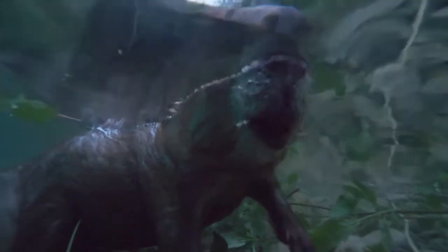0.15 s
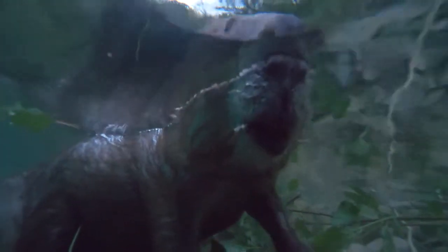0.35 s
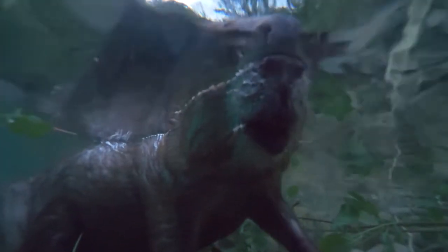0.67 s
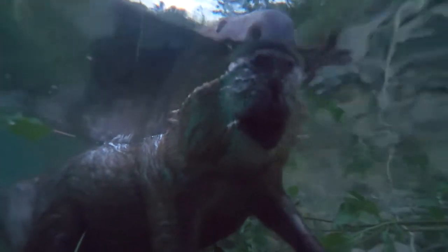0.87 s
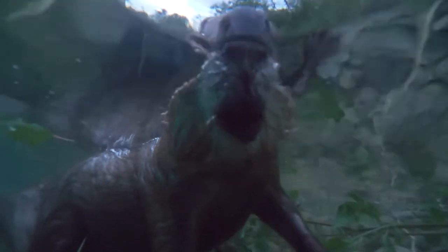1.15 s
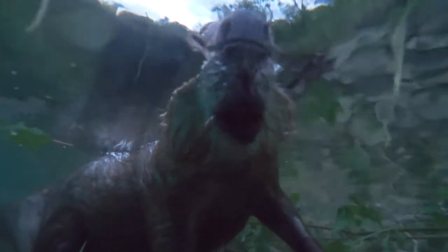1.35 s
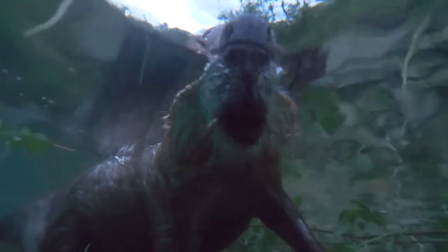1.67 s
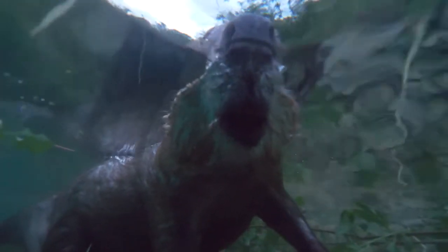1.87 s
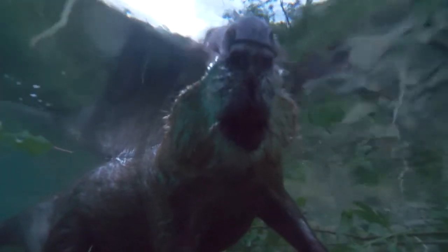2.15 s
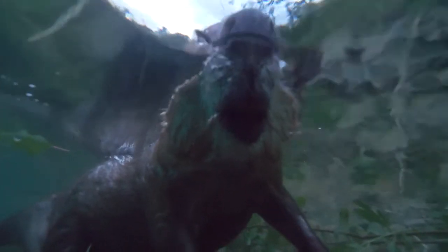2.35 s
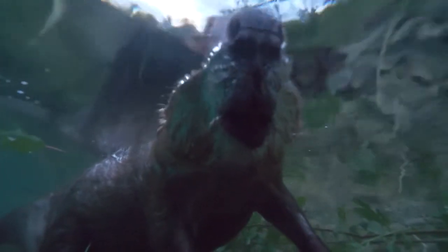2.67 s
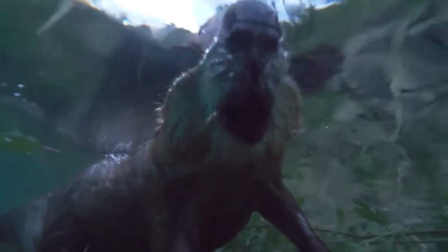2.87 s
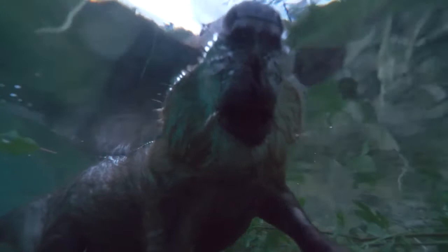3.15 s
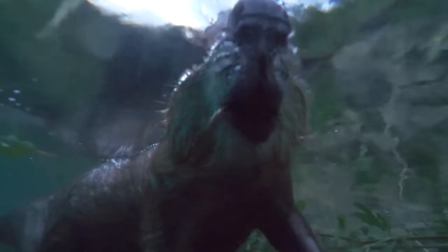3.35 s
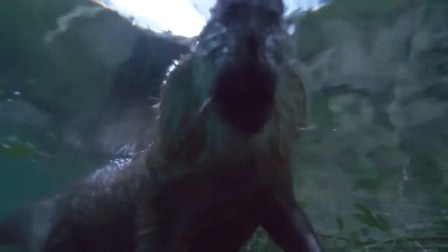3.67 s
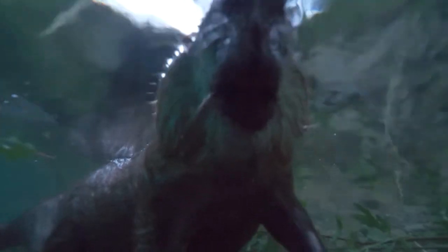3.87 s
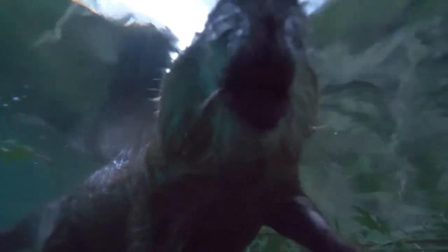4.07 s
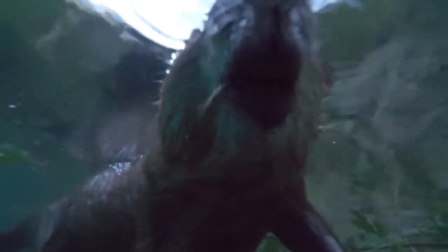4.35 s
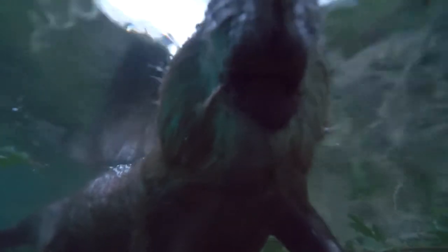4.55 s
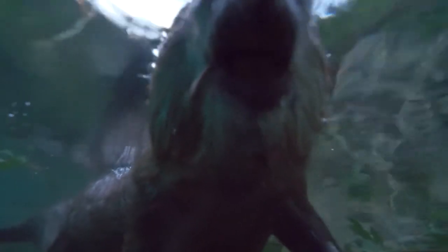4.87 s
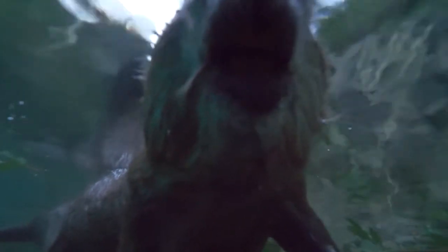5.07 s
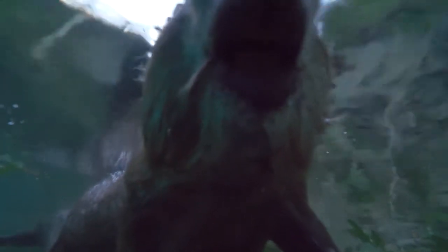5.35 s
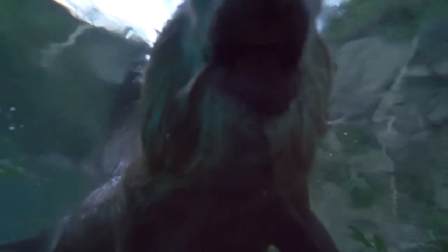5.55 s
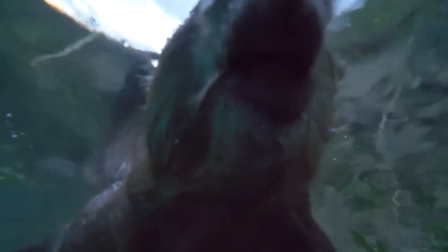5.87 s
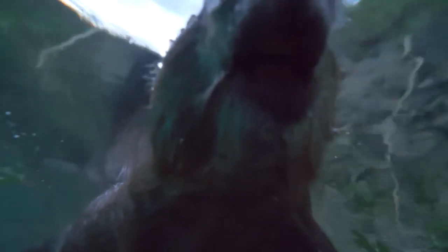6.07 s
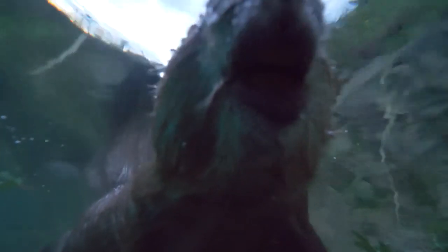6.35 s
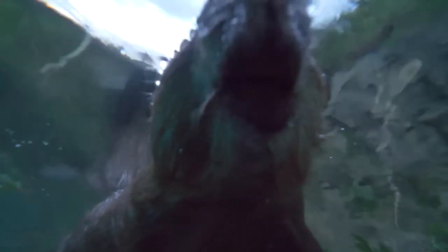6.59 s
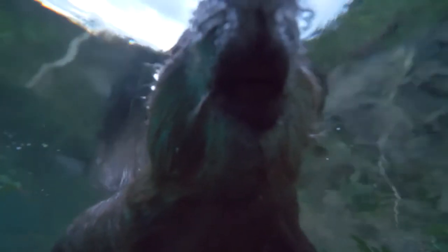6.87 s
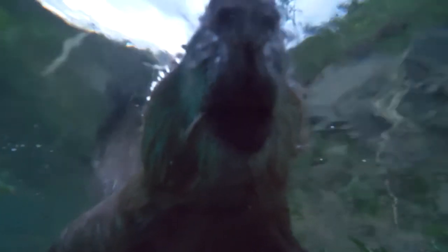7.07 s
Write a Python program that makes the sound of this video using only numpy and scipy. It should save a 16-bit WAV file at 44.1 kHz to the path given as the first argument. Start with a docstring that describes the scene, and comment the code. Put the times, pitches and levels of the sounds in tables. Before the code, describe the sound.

A low, hollow underwater hum in a river, with scattered knocks, scuffs and small clicks on a plastic camera housing.

```python
"""A low, hollow hum: a quiet river drives the resonances of a camera's plastic housing, held just under.
The grip knocks and scuffs the case, ringing the same modes, damped by the hand.
Close by: small clacks, sharp ticks and short pings (bubbles and brief rings of the housing).
Behind them the electronics add hiss and a thin pulsing whine."""
import sys
import numpy as np
from scipy import signal
from scipy.fft import rfft, irfft
from scipy.io import wavfile
from scipy.ndimage import uniform_filter1d

SR = 44100
rng = np.random.default_rng(int(sys.argv[2]) if len(sys.argv) > 2 else 0)


def waveform_to_disk(signal):
    """Save audio, clipped to [-1, 1], as 16-bit WAV at the path in sys.argv[1]."""
    frames = np.transpose(np.atleast_2d(signal))
    scaled = np.clip(frames, -1, 1) * 32767
    samples = np.round(scaled).astype(np.int16)
    wavfile.write(sys.argv[1], SR, samples)


N = 318402

# housing modes: f/Hz, width/Hz, level when touched/dB, level when water-driven/dB
HOUSING_MODES = [(93, 6.6, -7.5, -56), (125.3, 24.6, 7, -34.5), (156.2, 9.6, 2.5, -26), (228, 91, -66, -34),
                 (358.6, 22, -7.5, -3.5), (395.9, 35.7, 18, 2), (466, 50.5, 6.5, 1), (766.3, 41.8, 2.5, -3),
                 (975.2, 42, 8, -0.5), (1363, 25, -12, -13.5), (1506, 42, -2.5, -7), (2054, 24.4, -7, -20),
                 (2382, 127, 7, -34), (2987, 73, -3.5, -44.5), (3595, 140, 2, -44), (4000, 100, -2.5, -39),
                 (4140, 35, -25.5, -40)]
# water wash spectrum: f/Hz, level/dB
WASH_SPECTRUM = [(25, -35), (55, -30), (100, -25), (200, -7), (300, -1.5), (560, 4), (1100, -4),
                 (1700, -11), (2600, -27), (5000, -26)]
# knocks on the housing: t/s, contact time/s, body peak/dB, thump re body/dB
KNOCK_EVENTS = [(1.62, 0.0021, -5, -8.5), (1.6236, 0.002, -12.5, 0.5), (1.673, 0.0041, -23, -4),
                (1.807, 0.00044, -25, -1.5), (2.063, 0.0044, -23, -13.5), (2.156, 0.0031, -28, 1),
                (2.223, 0.0034, -15, -3.5), (2.451, 0.0046, -20.5, -6), (3.2647, 0.002, -14, -15.5),
                (3.444, .0042, -17.5, -14), (3.62, 0.0049, -19.5, -12), (3.644, 0.0032, -24, -15),
                (6.5429, 0.0019, -4, -7.5), (6.685, 0.0053, -23, -4), (6.824, 0.0052, -27, -16),
                (7.016, 0.0055, -28, -7), (7.094, 0.00073, -21, -16)]
# grip scuffs: centre t/s, length/s, body level/dB
SCUFF_EVENTS = [(0.113, .05, -41.5), (0.835, 0.022, -42), (1.67, 0.06, -29), (1.839, 0.17, -39),
                (2.224, 0.066, -30), (2.362, 0.11, -33.5), (2.432, 0.051, -31), (2.498, 0.043, -35.5),
                (3.096, 0.038, -38.5), (3.164, 0.043, -37.5), (3.442, 0.052, -33), (3.543, 0.058, -30),
                (3.638, 0.074, -31.5), (3.836, 0.025, -39.5), (4.03, 0.066, -37), (6.596, 0.03, -29),
                (6.733, 0.022, -31), (6.895, 0.068, -37.5), (7.116, 0.11, -34)]
# short pings, bubbles and brief rings of the housing: t/s, f/Hz, ring level/dB, snap re ring/dB
PING_EVENTS = [(0.099, 5840, -48, 4), (.1952, 2900, -47, 12.5), (.2056, 3320, -43, -18),
               (0.56, 370, -21, -2), (1.361, 410, -29.5, -12), (2.757, 392, -26.5, -12),
               (4.827, 1506, -33, -14), (4.992, 4140, -37.5, -6), (5.658, 1480, -17, -9.5),
               (5.759, 2370, -46, 9)]
# light hard clacks: t/s, wall peak/dB, crack peak/dB
CLACK_EVENTS = [(1.66, -30, -27.5), (2.193, -31, -57), (4.991, -24.5, -31.5), (4.997, -27.5, -26.5),
                (6.596, -29, -45)]
# ticks on the housing: t/s, relative level/dB
TICK_EVENTS = [(.346, -42), (.3591, -34.5), (.5476, -35.5), (.832, -31), (1.1783, -36), (1.5938, -37),
               (1.621, -34.5), (1.6551, -38), (1.808, -38), (2.251, -40.5), (2.469, -34.5), (2.926, -33.5),
               (3.266, -29), (3.3205, -34.5), (3.6444, -35), (4.024, -38), (6.543, -32)]
# tick spectrum: f/Hz, gain/dB
TICK_SPECTRUM = [(1500, -40), (3200, -24), (4000, 0), (6200, -6), (7800, 5), (8700, -0.5), (9900, 9.5),
                 (11300, 4.5), (12800, 2.5), (15500, -15)]
# microphone hiss spectrum: f/Hz, level/dB
HISS_SPECTRUM = [(1200, -9), (2700, 0), (5000, -2), (9800, -2.5), (12000, -7), (15300, -23)]
# difference between the microphone ports, hiss: f/Hz, side re mid/dB
HISS_SIDE_GAIN = [(2400, -3), (4400, 0.5), (8100, -9.5), (11000, -8), (15000, 14.5)]
# difference between the microphone ports, housing: f/Hz, side re mid/dB
SHELL_SIDE_GAIN = [(100, -61), (200, -28), (380, -25), (700, -15), (1300, -9.5), (2400, -6.5),
                   (4400, -10.5)]

HARD_CONTACT_S = 0.0022


def water_hum(hum_db=-39.5, wash_db=-50, skirt=2.33, widening=2.05, waver_db=1.47):
    """Moving water drives each mode with noise, over a broad wash; each swells on its own."""
    bins_hz = np.fft.rfftfreq(N, 1 / SR)
    hum = 0
    for hz, width_hz, _, db in HOUSING_MODES:
        detuning = 2 * (bins_hz - hz) / (widening * width_hz)
        resonance = (1 + detuning ** 2) ** (-skirt / 2)
        mode = irfft(rfft(rng.standard_normal(N)) * resonance, N)
        hum = hum + mode * undb(db + waver_db * drift(9))
    wash = colour(rng.standard_normal(N), WASH_SPECTRUM) * undb(2 * drift(3.1))
    return at_rms(hum, hum_db) + at_rms(wash, wash_db)


def housing_rings():
    """Impulse responses of four mode families: whole-case thump, body, walls, crack."""
    t = np.arange(SR // 6) / SR
    rings = []
    for lo_hz, hi_hz in [(72, 250), (310, 560), (690, 1800), (1900, 6000)]:
        modes = sum(undb(db) * np.exp(-np.pi * width_hz * t) * np.sin(2 * np.pi * hz * t)
                    for hz, width_hz, db, _ in HOUSING_MODES if lo_hz <= hz < hi_hz)
        rings.append(band(modes, lo_hz, hi_hz))
    return rings


def gripped_rings(added_width_hz=5.1):
    """A hand on the case damps every mode."""
    return [ring * np.exp(-np.pi * added_width_hz * np.arange(len(ring)) / SR)
            for ring in housing_rings()]


def blow(contact_s):
    """Force and chatter of a blow: a push, then a swelling rattle. Shorter contact, stronger push."""
    t = np.arange(SR // 20) / SR
    push = (t == 0) * (HARD_CONTACT_S / contact_s) ** 2
    chatter = rng.standard_normal(len(t)) * t * np.exp(-t / contact_s)
    return push + chatter / np.linalg.norm(chatter), chatter


def knocks(snap_re_crack_db=-10):
    """Each blow rings all four families; longer contact dulls walls and crack."""
    out, rings = np.zeros(N), gripped_rings()
    for start_s, contact_s, body_db, thump_db in KNOCK_EVENTS:
        force, chatter = blow(contact_s)
        doublings = np.log2(contact_s / HARD_CONTACT_S)
        wall_db, crack_db = -6 - doublings, -18 - 3.5 * doublings
        for ring, share_db in zip(rings, (thump_db, 0, wall_db, crack_db)):
            add(out, start_s, at_peak(signal.fftconvolve(force, ring), body_db + share_db))
        snap = band(chatter, 3600, 5750)  # straight from the contact
        add(out, start_s, at_peak(snap, body_db + crack_db + snap_re_crack_db))
    return out


def scuffs(creep_db=-59, slips_per_s=600, slip_cutoff_hz=790):
    """Skin sticks and slips on the case: dense uneven pushes into the modes, fine crackle on top."""
    t = np.arange(N) / SR
    pressure = undb(creep_db + 3.5 * drift(14))  # the resting hand creeps
    for centre_s, length_s, db in SCUFF_EVENTS:
        pressure += undb(db) * np.exp(-(2 * (t - centre_s) / length_s) ** 2)
    slipping = rng.random(N) < slips_per_s / SR
    slips = slipping * rng.choice([-1, 1], N) * undb(3 * rng.standard_normal(N))
    sharp = slips * np.abs(slips)  # big slips are sharpest: treble comes in separate ticks
    # skin is too slow to push the walls much above the cutoff
    soft = signal.sosfilt(signal.butter(2, slip_cutoff_hz, fs=SR, output="sos"), slips)
    thump, body, wall, crack = (signal.fftconvolve(force, ring)[:N]
                                for force, ring in zip((slips, slips, soft, sharp), gripped_rings()))
    ringing = at_rms(thump, -5.5) + at_rms(body, 0) + at_rms(wall, -5) + at_rms(crack, -22.5)
    rasp = at_rms(band(sharp, 2400, 6300), -28)
    crackle = at_rms(colour(sharp, TICK_SPECTRUM), -29)
    return pressure * (ringing + rasp + crackle)


def pings(t60_at_1khz_s=0.057, rise=0.051, onset_s=0.00032, snap_s=0.006):
    """Bubbles and brief rings of the housing: a snap and a tone creeping up; high ones fade sooner."""
    out, t = np.zeros(N), np.arange(SR // 10) / SR
    for start_s, hz, db, snap_db in PING_EVENTS:
        t60_s = t60_at_1khz_s * (hz / 1000) ** -0.4
        envelope = (1 - np.exp(-t / onset_s)) * undb(-60 * t / t60_s)
        ring = at_peak(envelope * np.sin(2 * np.pi * hz * t * (1 + rise * t / t60_s)), db)
        burst = rng.standard_normal(len(t)) * np.exp(-t / snap_s)
        snap = at_peak(band(burst, hz / 2, 2 * hz), db + snap_db)
        add(out, start_s, band(ring + snap, 0.72 * hz, 1.6 * hz))  # rounds the attack
    return out


def clacks(contact_s=0.0018):
    """Something small and hard rings the walls without moving the case."""
    out = np.zeros(N)
    _, _, wall, crack = housing_rings()
    for start_s, wall_db, crack_db in CLACK_EVENTS:
        force, chatter = blow(contact_s)
        wall_ring = at_peak(signal.fftconvolve(force, wall), wall_db)
        crack_ring = at_peak(signal.fftconvolve(force, crack), crack_db)
        snap = at_peak(band(chatter, 1500, 2500), crack_db - 3)
        tick = at_peak(colour(chatter, TICK_SPECTRUM), crack_db - 12)
        add(out, start_s, wall_ring + crack_ring)
        add(out, start_s, snap + tick)
    return out


def ticks(gain_db=-14, side_db=-7, faint_count=6, faint_db=-44, faint_until_s=4):
    """Tiny hard snaps, stereo: a 1 ms burst with a short fading tail."""
    mid, side = np.zeros((2, N))
    t = np.arange(SR // 30) / SR
    envelope = (1 - np.exp(-t / 0.0003)) * (np.exp(-t / 0.001) + 0.7 * np.exp(-t / 0.004))
    faint = [(rng.uniform(0, faint_until_s), faint_db + rng.uniform(-2, 2)) for _ in range(faint_count)]
    for start_s, db in list(TICK_EVENTS) + faint:
        for channel in (mid, side):
            add(channel, start_s, at_rms(rng.standard_normal(len(t)) * envelope, db + gain_db))
    return stereo(colour(mid, TICK_SPECTRUM), undb(side_db) * colour(side, TICK_SPECTRUM))


def electronics(hiss_db=-60, whine_db=-62, whine_hz=10866, frame_hz=50, whistles_db=-76):
    """Microphone hiss, a whine on for about half of each picture frame, two faint steady whistles."""
    t = np.arange(N) / SR
    mid, side = (at_rms(colour(rng.standard_normal(N), HISS_SPECTRUM), hiss_db) for _ in range(2))
    hiss = stereo(mid, colour(side, HISS_SIDE_GAIN))
    switched_on = np.cos(2 * np.pi * (frame_hz * t - 0.17)) > -0.1
    gate = uniform_filter1d(switched_on.astype(float), 60)
    whine = gate * np.sin(2 * np.pi * np.cumsum(whine_hz + 22 * drift(60)) / SR)
    whistles = np.sin(2 * np.pi * 15500 * t) + np.sin(2 * np.pi * 15550 * t)
    return hiss + at_rms(whine, whine_db) + at_rms(whistles, whistles_db)


def microphone_ports(x, detour_s=0.001204):
    """A second path round the shell arrives late and pushes the two ports in opposite ways."""
    late = np.interp(np.arange(N) - detour_s * SR, np.arange(N), x, left=0)
    return stereo(x, colour(late, SHELL_SIDE_GAIN))


def stereo(mid, side):
    """Mid and side to left and right."""
    return np.array([mid + side, mid - side])


def undb(db):
    """Decibels to gain."""
    return 10 ** (np.asarray(db) / 20)


def at_rms(x, db):
    """Scale to an rms level."""
    return x * undb(db) / np.sqrt(np.mean(x ** 2))


def at_peak(x, db):
    """Scale to a peak level."""
    return x * undb(db) / np.max(np.abs(x))


def colour(x, points):
    """Filter by (f/Hz, gain/dB) points, interpolated over log frequency."""
    hz, db = np.transpose(points)
    bins_hz = np.fft.rfftfreq(len(x), 1 / SR)
    gain_db = np.interp(np.log(bins_hz + 1), np.log(hz), db)
    return irfft(rfft(x) * undb(gain_db), len(x))


def band(x, lo_hz, hi_hz):
    """Causal band-pass."""
    return signal.sosfilt(signal.butter(2, [lo_hz, hi_hz], "band", fs=SR, output="sos"), x)


def drift(rate_hz):
    """Random steps, smoothed twice; rms 1."""
    hold = int(SR / rate_hz)
    steps = np.repeat(rng.standard_normal(600)[:N // hold + 1], hold)[:N]
    return at_rms(uniform_filter1d(uniform_filter1d(steps, hold), hold), 0)


def add(out, start_s, sound):
    """Mix a sound in at start_s."""
    i = int(start_s * SR)
    out[i:i + len(sound)] += sound[:N - i]


def scene():
    """Housing sounds and pings through the two ports, plus close ticks and electronics."""
    through_shell = water_hum() + knocks() + clacks() + scuffs() + pings()
    return microphone_ports(through_shell) + ticks() + electronics()


def record(dry, low_cut_hz=52, high_cut_hz=15900):
    """The camera drops the deepest bass, clips at full scale and cuts the top."""
    high_pass = signal.butter(3, low_cut_hz, "high", fs=SR, output="sos")
    low_pass = signal.ellip(10, 0.2, 80, high_cut_hz, fs=SR, output="sos")
    clipped = np.clip(signal.sosfilt(high_pass, dry), -1, 1)
    return signal.sosfilt(low_pass, clipped)


dry = scene()
out = record(dry)
waveform_to_disk(out)
```